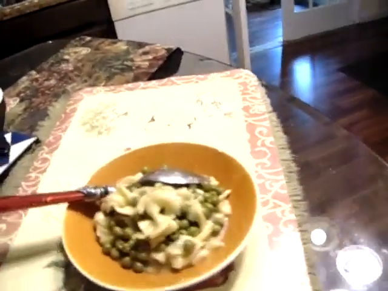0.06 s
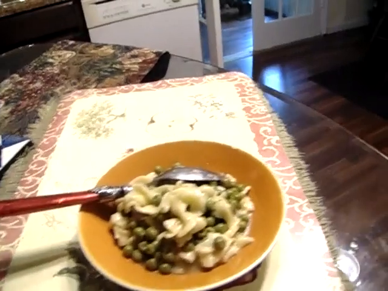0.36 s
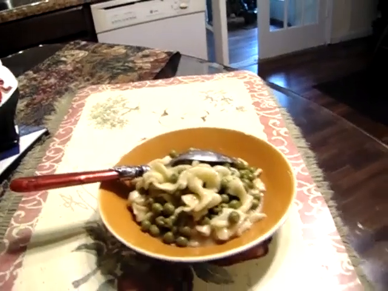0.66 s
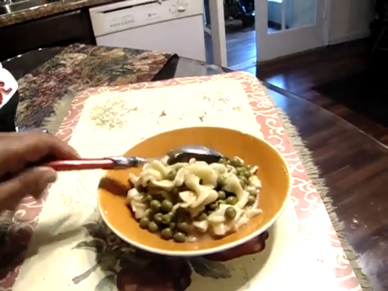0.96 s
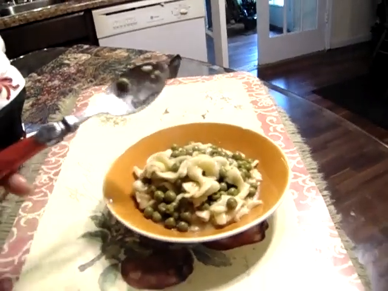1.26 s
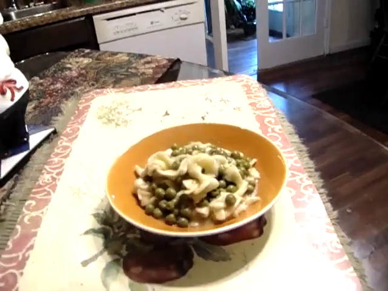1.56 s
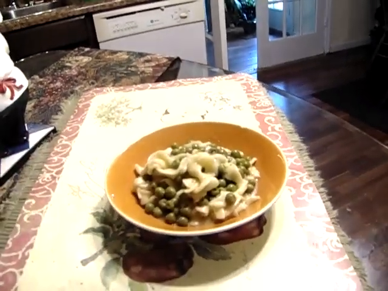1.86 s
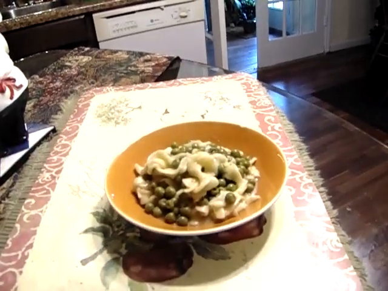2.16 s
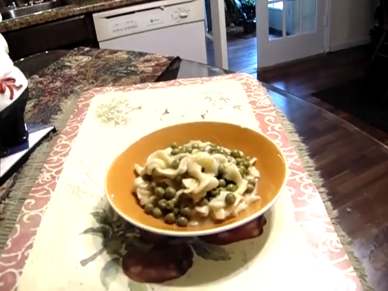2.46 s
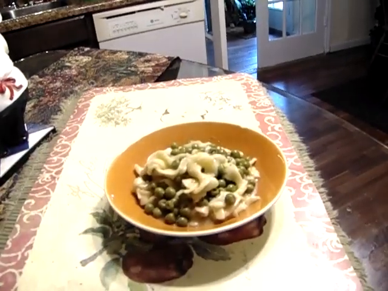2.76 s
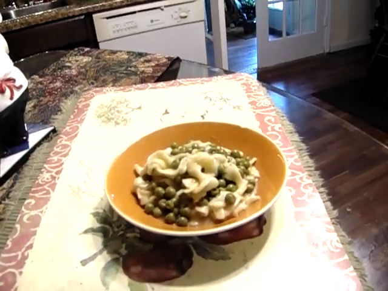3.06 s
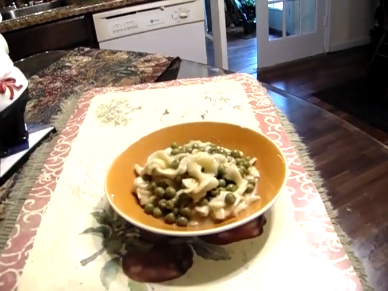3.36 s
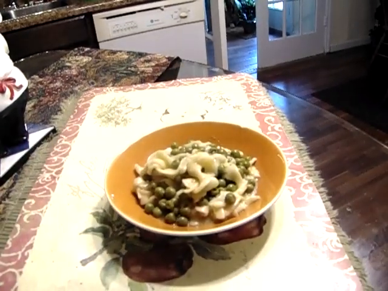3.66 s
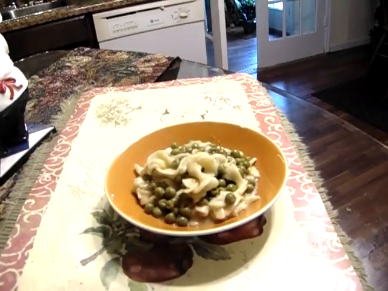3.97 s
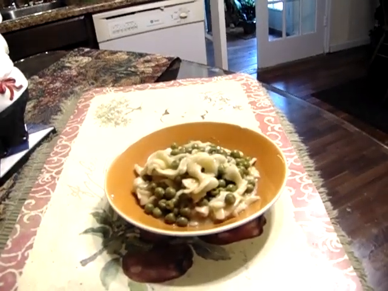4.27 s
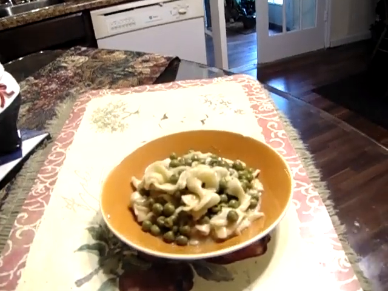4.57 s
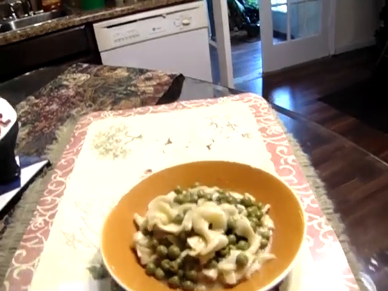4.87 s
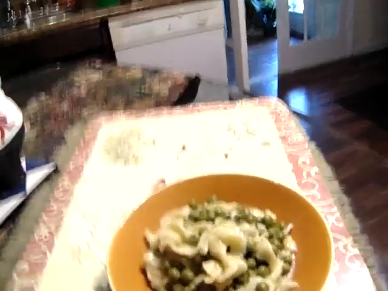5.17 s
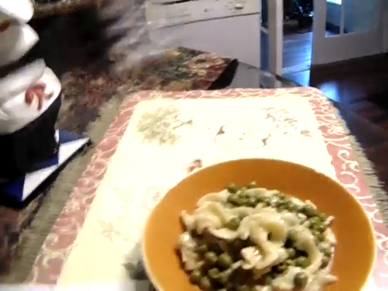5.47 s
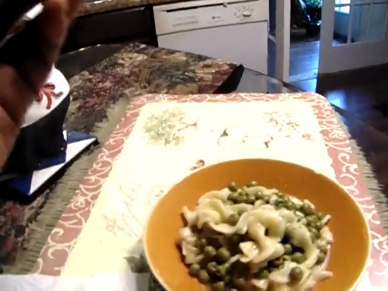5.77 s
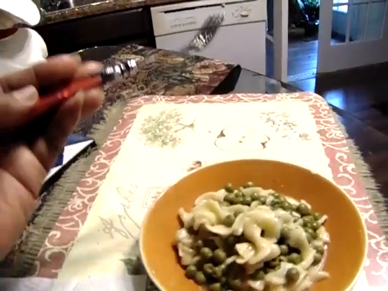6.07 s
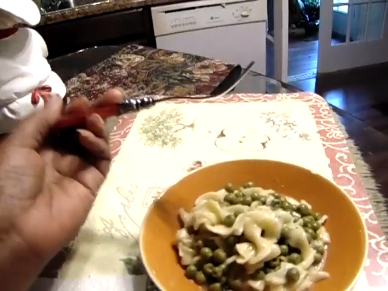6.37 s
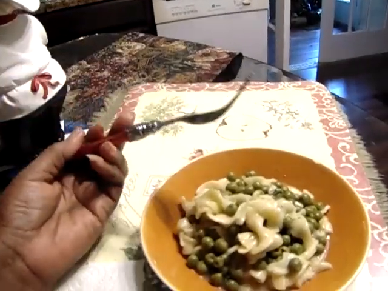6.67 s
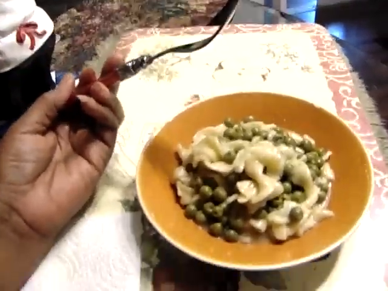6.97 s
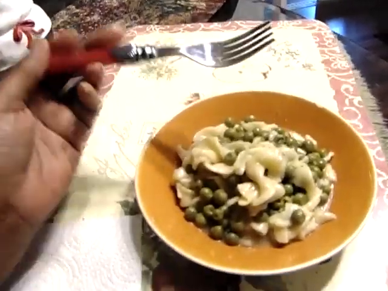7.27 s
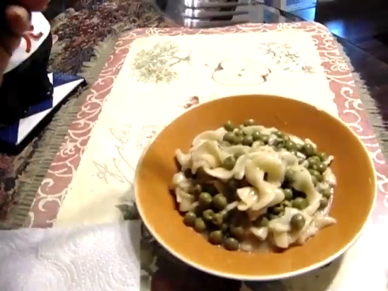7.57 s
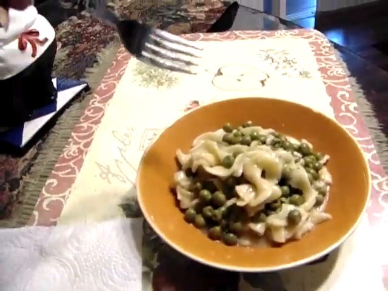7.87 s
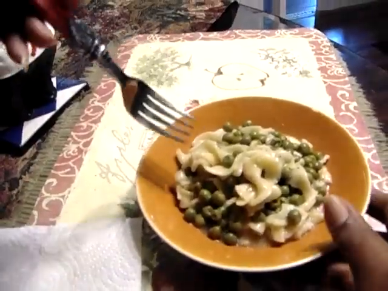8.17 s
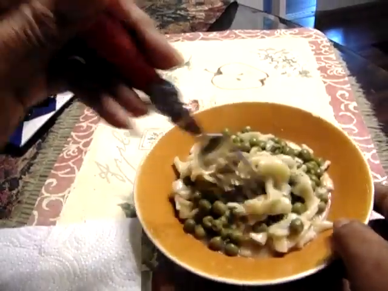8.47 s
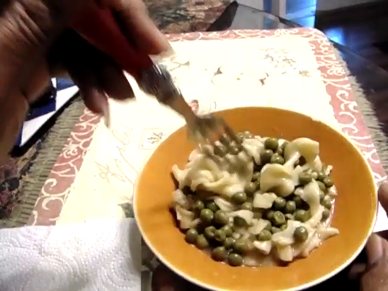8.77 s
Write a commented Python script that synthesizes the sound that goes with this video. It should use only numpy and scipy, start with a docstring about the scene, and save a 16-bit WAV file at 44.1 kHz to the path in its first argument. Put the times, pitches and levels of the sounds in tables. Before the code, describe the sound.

A faint appliance hum and airy hiss fill a quiet kitchen throughout. In the first second a camera is shifted on a table: close, dry plastic knocks, low thumps and ticks, with hands brushing cloth. Another bump comes at 1.4 seconds. At 2.2 seconds there is a faint, distant clink. At 3 seconds a spoon is put down to one side with a dull clack, and at 3.3 it strikes crockery with a bright, briefly ringing clink, the loudest sound, with a little room echo. From 4.3 to 5.6 seconds the camera is shoved again, giving a run of hollow knocks, thumps and short skids, strongest near 5.2. Light finger taps and ticks on the case follow around 6.5 and from 7.3, with a firmer bump at 7.7. From 8 to about 8.6 seconds a fork softly stirs noodles, with one small tick.

```python
"""Close knocks, thumps and ticks of a plastic case: a camera is shifted about on a dining table.
Behind it an appliance hums in a quiet kitchen. Hands brush the cloth and a fork stirs a bowl of noodles.
After a faint, distant clink, a spoon is put down to one side: a dull clack, then a bright clink on
crockery. All is heard in mono at the camera's microphone, the case nearly dry, the spoon with more room."""
import sys
import numpy as np
from scipy import signal
from scipy.fft import rfft, irfft, next_fast_len
from scipy.io import wavfile
from scipy.ndimage import uniform_filter1d, map_coordinates

SR = 44100
rng = np.random.default_rng(int(sys.argv[2]) if len(sys.argv) > 2 else 0)


def generate_wav(signal):
    """Clip the signal to [-1, 1] and save it as 16-bit WAV at the path in sys.argv[1]."""
    frames = np.transpose(np.atleast_2d(signal))
    scaled = np.clip(frames, -1, 1) * 32767
    pcm = np.round(scaled).astype(np.int16)
    wavfile.write(sys.argv[1], SR, pcm)


N = 388517
T = np.arange(SR * 3 // 4) / SR  # time within one hit [s]


def amp(db):
    """Decibels to gain."""
    return 10 ** (np.asarray(db) / 20)


def unit(x):
    """Scale to rms 1."""
    return x / np.sqrt(np.mean(x ** 2) + 1e-20)


def crest(x):
    """Scale to peak 1."""
    return x / np.abs(x).max()


def struck(x):
    """Scale a hit to the energy of 10 ms at rms 1."""
    return x / np.sqrt(np.sum(x ** 2) / (SR / 100))


def along(points, hz):
    """Interpolate (frequency [Hz], value) points on a log frequency axis."""
    knots_hz, values = np.transpose(points)
    return np.interp(np.log(hz + 1), np.log(knots_hz + 1), values)


def fade(t60):
    """An exponential decay, 60 dB down after t60 seconds."""
    return np.exp(-np.log(1000) * T / t60)


def wobble(knots_per_s):
    """A smooth random curve as long as a hit."""
    return map_coordinates(rng.standard_normal(1000), [T * knots_per_s])


def add(track, s, sound):
    """Mix a sound in at s seconds."""
    part = track[max(round(s * SR), 0):][:len(sound)]
    part += sound[:len(part)]


def filtered(x, response):
    """Filter x by a complex response of frequency."""
    size = next_fast_len(len(x) + SR // 4)
    return irfft(rfft(x, size) * response(np.fft.rfftfreq(size, 1 / SR)), size)[:len(x)]


def noise(colour, size=len(T)):
    """Noise of rms 1, shaped by (frequency [Hz], level [dB]) points."""
    return unit(filtered(rng.standard_normal(size), lambda hz: amp(along(colour, hz))))


def resonate(x, modes):
    """Pass x through resonances of alternating sign: (frequency [Hz], width [Hz], gain [dB])."""
    def response(f):
        return sum((-1) ** k * amp(db) * 1j * f * width / (hz * hz - f * f + 1j * f * width)
                   for k, (hz, width, db) in enumerate(modes))
    return filtered(x, response)


# The kitchen's reverberation: (frequency [Hz], t60 [s])
ROOM_DECAY = [(100, 0.49), (500, 0.28), (2000, 0.37), (7000, 0.31), (14000, 0.22)]
def in_room(x, wet_db):
    """The direct sound plus a short diffuse tail, longest in the bass."""
    hz, t, spectrum = signal.stft(rng.standard_normal(len(T)), SR, nperseg=256)
    decay = np.exp(-np.log(1000) * t / along(ROOM_DECAY, hz)[:, None])
    tail = signal.istft(spectrum * decay, SR)[1][:len(T)]
    tail *= 1 - np.exp(-T / 0.004)
    return x + amp(wet_db) * signal.fftconvolve(x, tail / np.linalg.norm(tail))[:len(x)]


# The appliance's motor in the background: (frequency [Hz], relative level [dB])
MOTOR_LINES = [(59.2, -64.5), (236.9, -68), (301.5, -64), (473.7, -66.5), (586.8, -65.5), (721.4, -60),
               (823.6, -67.5), (904.4, -71)]
# Air noise in the room: (frequency [Hz], relative level [dB])
AIR_SPECTRUM = [(12, -32), (20, -8), (65, -1), (86, -11), (107, -6.5), (214, -5.5), (298, -7), (403, -5),
                (438, -6.5), (476, -11.5), (719, -7.5), (974, -12), (3760, -22.5), (13000, -25),
                (14500, -26)]
def room_tone():
    """Slightly unsteady motor lines, a fan's duct resonance and steady air noise."""
    t = np.arange(N) / SR
    hum = np.zeros(N)
    for hz, db in MOTOR_LINES:
        drift = map_coordinates(rng.standard_normal(N // 4000), [np.arange(N) / 8000])
        hum += amp(db - 1.5) * np.sqrt(2) * np.sin(2 * np.pi * hz * t + hz / 600 * drift)
    fan = unit(resonate(rng.standard_normal(N), [(734, 95, 5.5), (816, 110, -5.5)]))
    return hum + amp(-58) * fan + amp(-50) * noise(AIR_SPECTRUM, N)


# The plastic case, right at the microphone: (frequency [Hz], width [Hz], gain [dB])
CASE_MODES = [(877, 74, -9), (1142, 88, 2.5), (1425, 330, -7), (1740, 180, -4.5), (2800, 810, -12.5),
              (3730, 2700, -17.5)]
# The hollow inside it: (frequency [Hz], relative level [dB])
HOLLOW_SPECTRUM = [(100, -51), (190, -3), (275, 4), (350, -3.5), (450, -0.5), (550, 1.5), (680, -7),
                   (900, -8.5), (1500, -22), (4000, -66)]
RATTLE_T60_S = 0.029  # the loose parts
def knock(db, hollowness_db, rattle_t60):
    """One contact is a push with a brief rattle; it rings the case and its hollow inside."""
    push = (T == 0) + 0.12 * rng.standard_normal(len(T)) * fade(rattle_t60)
    # a softer, hollower contact lasts longer and leaves the upper modes quiet
    cutoff_hz = 1270 * 2 ** (-0.12 * hollowness_db)
    push = filtered(push, lambda f: 1 / (1 + 1.4j * f / cutoff_hz - (f / cutoff_hz) ** 2))
    case = struck(resonate(push, CASE_MODES))
    hollow = amp(hollowness_db) * struck(noise(HOLLOW_SPECTRUM) * fade(0.084))
    return amp(db) * in_room(case + hollow, wet_db=-13)


def thump(db, hz):
    """A soft bump rocks the camera for a few slow cycles and leaves a low shudder."""
    rock = -np.sin(2 * np.pi * hz * T) * fade(0.12)
    rumble = noise([(20, -8), (55, 0), (110, -11), (250, -14), (900, -47.5)])
    shudder = rumble * fade(0.43) * (1 - np.exp(-T / 0.0027))
    return amp(db) * rock + amp(-19.5 + 0.66 * db) * shudder


def grain(depth_db, size):
    """The uneven catching of surfaces in contact, as a gain of rms 1."""
    roughness = unit(uniform_filter1d(rng.standard_normal(size), size=90))
    return unit(amp(depth_db * roughness))


# The broad noise of a rough contact: (frequency [Hz], relative level [dB])
CONTACT_SPECTRUM = [(60, -2), (300, 3.5), (650, 3.5), (1200, 1), (2200, -0.5), (4200, -5), (5600, -6.5),
                    (7000, -10.5), (10000, -11.5), (14500, -13)]
def rough_contact(db, rise_s, t60, ring_hz, ring_db):
    """Grainy noise that swells and dies, with one narrow ring at ring_db relative to the noise."""
    envelope = crest((1 - np.exp(-T / rise_s)) * fade(t60))
    ring = unit(resonate(rng.standard_normal(len(T)), [(ring_hz, ring_hz / 11, 0)]))
    texture = unit(noise(CONTACT_SPECTRUM) + amp(ring_db) * ring)
    return amp(db) * envelope * texture * grain(depth_db=2.0, size=len(T))


# The camera is shoved on the table: (time [s], knock level [dB], hollowness [dB], rocking time [s],
# rebound gain [dB], thump level [dB], thump frequency [Hz], skid level [dB])
CAMERA_SHOVES = [(0.017, -35, -5.5, 0.0076, -15, -40, 50, -54),
                 (0.108, -27, -4, 0.022, 2.5, -31, 60, -34.5), (0.449, -36, 0, 0.046, -9, -21, 112, -51),
                 (0.671, -35, 0, .028, 0.5, -33, 104, -47), (1.382, -36, -1, 0.019, -3.5, -32, 83, -53),
                 (4.107, -69, 8, .016, -2, -36.5, 150, -73), (4.317, -39, -1.5, 0.022, -21, -41, 122, -52),
                 (4.763, -32.5, -4.5, .025, -2.5, -37, 148, -41.5),
                 (4.974, -27, -4.5, .008, 0, -26, 127, -33), (5.051, -34, -2.5, 0.0081, 4, -33, 60, -40.5),
                 (5.173, -23.5, -5, .002, -16, -30, 171, -34), (5.468, -33, 0, 0.019, -1, -23.5, 96, -40.5),
                 (5.595, -32, 3, 0.012, 3, -22.5, 96.5, -39),
                 (7.689, -28.5, -0.5, .016, -5, -22.5, 98.3, -40.5),
                 (7.868, -34.5, 2, 0.0045, -1.5, -33.5, 100, -46.5)]
def shoves():
    """Each shove thumps the camera; it rocks through three contacts while a skid builds up and dies."""
    out = np.zeros(N)
    for s, db, hollowness_db, rock_s, rebound_db, thump_db, thump_hz, skid_db in CAMERA_SHOVES:
        rattle_t60 = RATTLE_T60_S + 1.9 * rock_s  # slow rocking keeps the loose parts going
        # the last rebound comes sooner and weaker than the first; each stirs the hollow less
        contacts = [(0, 0), (rock_s, rebound_db), (1.78 * rock_s, rebound_db - 7)]
        for k, (delay_s, change_db) in enumerate(contacts):
            add(out, s + delay_s, knock(db + change_db, hollowness_db - 2.5 * k, rattle_t60))
        add(out, s, thump(thump_db, thump_hz))
        skid = rough_contact(skid_db, rise_s=rock_s, t60=0.32, ring_hz=5430, ring_db=-13)
        add(out, s, skid)
    return out


# The soft and the dry part of a stroke: (frequency [Hz], relative level [dB])
RUB_SPECTRUM = [(400, -13), (1200, 2), (2600, -0.5), (4000, -4.5), (7000, -28), (14500, -40)]
HISS_SPECTRUM = [(2000, -6), (4500, 0), (8000, 1), (9500, -3), (11500, 0.5), (14500, -2.5)]
# Hands on the cloth and fork in the noodles, close by:
# (time of top speed [s], swell [s], fade [s], rub level [dB], hiss level [dB])
HAND_STROKES = [(0.025, 0.042, 0.033, -49.5, -70), (0.35, 0.32, 0.068, -49.5, -47.5),
                (0.56, 0.07, 0.098, -56, -54.5), (0.745, 0.028, 0.097, -47, -53),
                (2.25, .13, 0.15, -60, -51), (4.35, 0.065, 0.2, -63, -49), (4.54, 0.022, .1, -56, -50),
                (8.042, 0.009, 0.064, -48.5, -51), (8.125, 0.035, 0.081, -51, -60),
                (8.51, 0.12, .11, -49.5, -51)]
def brushing():
    """Each stroke speeds up and slows down; its speed drives a soft rub and a dry hiss."""
    out, t = np.zeros(N), np.arange(N) / SR
    rub, hiss = noise(RUB_SPECTRUM, N), noise(HISS_SPECTRUM, N)
    for s, swell_s, fade_s, rub_db, hiss_db in HAND_STROKES:
        speed = np.exp(-((t - s) / np.where(t < s, swell_s, fade_s)) ** 2)
        out += speed * (amp(rub_db) * rub + amp(hiss_db) * hiss)
    return out * grain(depth_db=1.5, size=N)


# Fingers on the case, right at the microphone: (time [s], level [dB], hollowness [dB])
FINGER_TAPS = [(0.211, -33.5, -11), (0.634, -39.5, -13), (0.729, -36, -17), (0.813, -43.5, -6),
               (0.95, -48.5, -6), (4.388, -48, -11), (5.202, -42, -12), (5.341, -34, -14),
               (5.453, -38.5, -2), (5.633, -43.5, 10.5), (6.512, -42, -12), (6.549, -46.5, -14),
               (6.612, -42, -5), (6.65, -38.5, 6), (6.752, -43.5, -3), (7.264, -44.5, -2.5),
               (7.575, -42.5, 9), (7.605, -46, -12), (7.717, -38, -20), (7.739, -37, -4), (7.782, -36, -7),
               (7.814, -44, 0)]
def taps():
    """Single contacts on the case, too light to move it."""
    out = np.zeros(N)
    for s, db, hollowness_db in FINGER_TAPS:
        add(out, s, knock(db, hollowness_db, RATTLE_T60_S))
    return out


# The snap of a tick: (frequency [Hz], relative level [dB])
SNAP_SPECTRUM = [(500, -34), (2500, -3), (3600, -2), (4300, -0.5), (6000, -1), (8000, -7), (12000, -2.5),
                 (14500, -10.5)]
# Small ticks, all close by except the one at 2.221 s, which belongs to the distant clink:
# (time [s], peak level [dB], ring frequency [Hz])
SHARP_TICKS = [(0.4648, -27.5, 4270), (0.678, -28, 4260), (2.221, -29.5, 3730), (3.973, -36, 10500),
               (5.173, -20.5, 8000), (5.486, -27.5, 4050), (5.607, -36, 7540), (6.549, -38, 4970),
               (6.685, -38, 12000), (6.752, -31.5, 12000), (7.605, -32.5, 8000), (7.7018, -37, 8400),
               (7.717, -34, 4300), (7.78, -36, 8000), (7.8155, -36, 7500), (7.8746, -37, 4300),
               (8.516, -28.5, 10900)]
def ticks():
    """Tiny hard contacts, each with one brief ring."""
    out = np.zeros(N)
    for s, db, hz in SHARP_TICKS:
        snap = noise(SNAP_SPECTRUM) * fade(0.0093)
        ring = resonate(snap, [(hz, hz / 7, 0)])
        tick = crest(unit(snap) + 1.1 * unit(ring))
        add(out, s, in_room(amp(db) * tick, wet_db=-21))
    return out


def distant_clink():
    """A faint clink off to one side: a brief, rough ring near 3.7 kHz, whose tick is played by ticks()."""
    out = np.zeros(N)
    add(out, 2.214, rough_contact(db=-47.5, rise_s=0.0052, t60=0.24, ring_hz=3730, ring_db=9))
    return out


def blow(colour, bounce_s, bounce_db, t60):
    """A hard contact and its rebound a few milliseconds later."""
    out = noise(colour) * fade(t60)
    add(out, bounce_s, amp(bounce_db) * noise(colour) * fade(t60))
    return out


# The spoon's dull and bright contacts, off to one side: (frequency [Hz], relative level [dB])
CLACK_SPECTRUM = [(200, -46), (420, -21), (620, -9), (820, -2.5), (1250, 2.5), (1500, -13), (1850, -1),
                  (2600, -6.5), (3300, -10), (5000, -15), (8000, -14.5), (14500, -33)]
CLINK_SPECTRUM = [(150, -52), (310, -16), (430, -27), (650, -11.5), (900, -6), (1350, -6.5), (2000, -9),
                  (2800, -14), (3100, -3), (3400, -14), (4500, -8), (6200, -7), (8500, -3.5), (14500, -15)]
# Spoon and crockery ringing together: (frequency [Hz], relative level [dB], t60 [s])
SPOON_AND_DISH_MODES = [(314.2, -42, 0.53), (1243, -33, 0.42), (1725, -26.5, 0.36), (2260, -32, 0.44),
                        (2500, -39, 0.39), (3046, -24, 0.39), (3100, -23.5, 0.39), (3810, -29, 0.33),
                        (3830, -22.5, 0.29), (4530, -38, 0.3), (4700, -30, 0.29), (4870, -31, 0.24),
                        (5505, -37, 0.37), (5596, -28, 0.37), (5570, -33, 0.37), (6470, -17, 0.25),
                        (6500, -21, 0.28), (7212, -31, 0.26), (8030, -23, 0.26), (8700, -34, 0.3),
                        (9300, -34, 0.25), (9663, -31, 0.26), (10695, -36, 0.3), (11800, -44, 0.26)]
def spoon():
    """The handle lands with a clack; then the steel strikes crockery and both ring."""
    out = np.zeros(N)
    clack = amp(-23.5) * blow(CLACK_SPECTRUM, bounce_s=0.005, bounce_db=-2, t60=0.081)
    add(out, 2.9755, in_room(clack, wet_db=-4.5))
    ring = np.zeros(len(T))
    for hz, db, t60 in SPOON_AND_DISH_MODES:
        # the spoon still chatters against the dish, which roughens every mode
        phase = 2 * np.pi * (hz * T + rng.random()) + 0.2 * wobble(knots_per_s=90)
        ring += amp(db - 2.5 + 3.7 * wobble(knots_per_s=80)) * np.sin(phase) * fade(t60)
    ring *= 1 - np.exp(-T / 0.001)
    clink = amp(-13.5) * blow(CLINK_SPECTRUM, bounce_s=0.006, bounce_db=2.5, t60=0.058)
    add(out, 3.302, in_room(ring, wet_db=-14.5) + in_room(clink, wet_db=-2.5))
    # the dish passes the blow on to the board beneath it
    impulse = (T == 0) * 1.0
    board = crest(resonate(impulse, [(760, 130, -6.5), (920, 130, 0.5), (1290, 110, -3.5)]))
    add(out, 3.306, in_room(amp(-14.5) * board, wet_db=-3))
    return out


def scene():
    """Everything at one microphone on the dining table."""
    return (room_tone() + shoves() + brushing() + taps() + ticks() + distant_clink() + spoon())[None]


def record(dry):
    """The camera keeps nothing above its band limit."""
    top_hz = 14400
    return filtered(dry[0], lambda hz: 1 / np.sqrt(1 + (hz / top_hz) ** 200))[None]


dry = scene()
out = record(dry)
generate_wav(out)
```